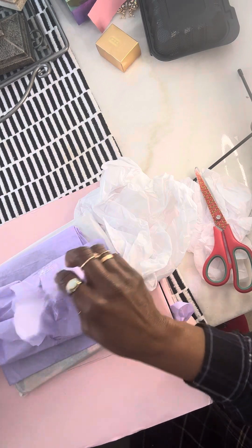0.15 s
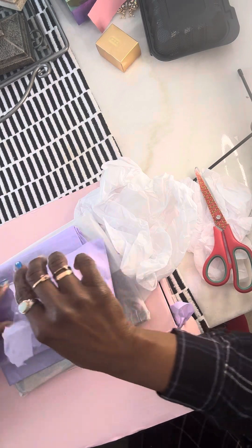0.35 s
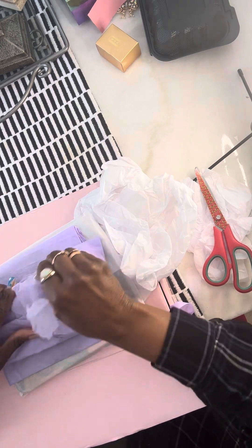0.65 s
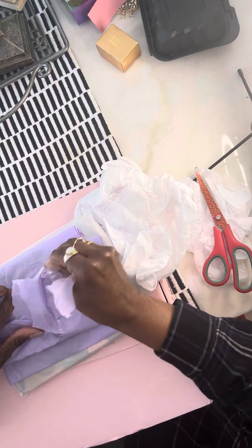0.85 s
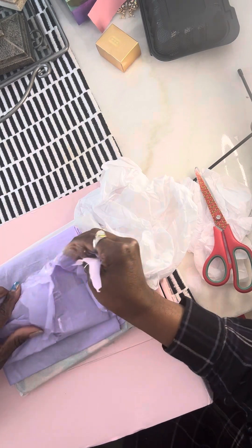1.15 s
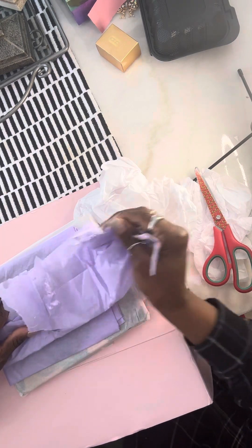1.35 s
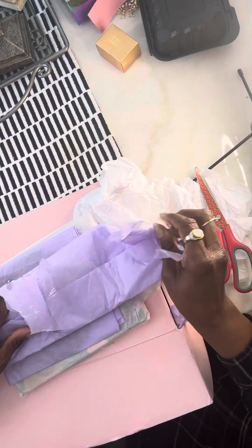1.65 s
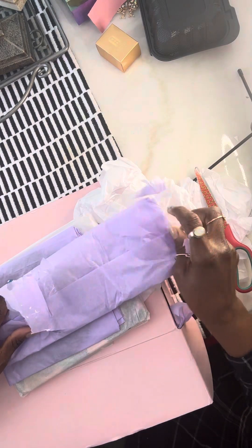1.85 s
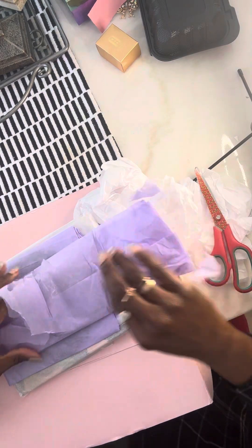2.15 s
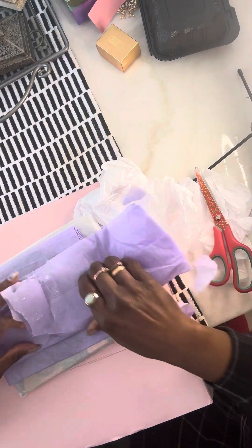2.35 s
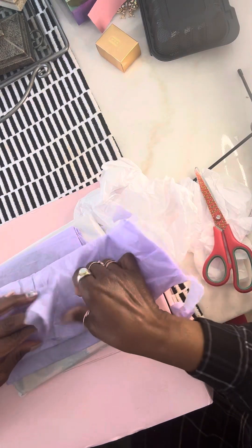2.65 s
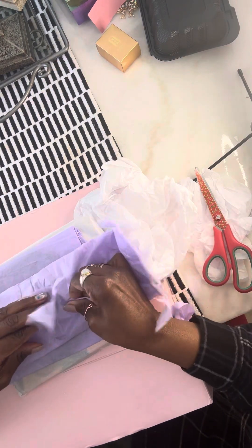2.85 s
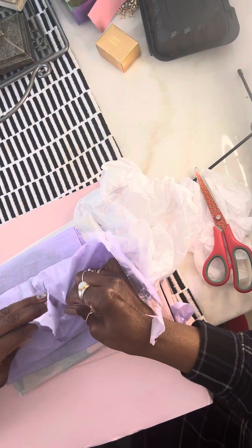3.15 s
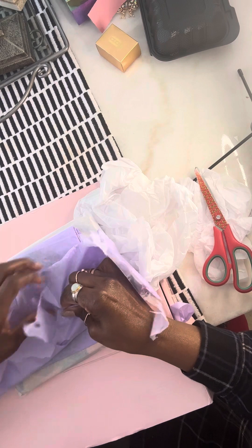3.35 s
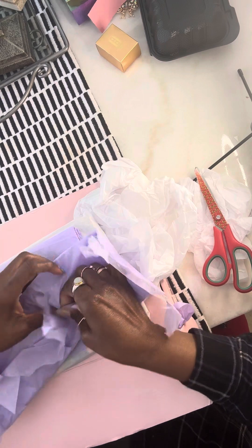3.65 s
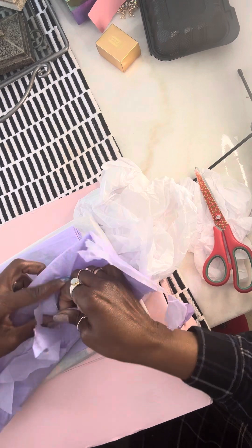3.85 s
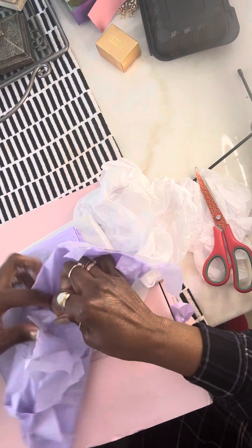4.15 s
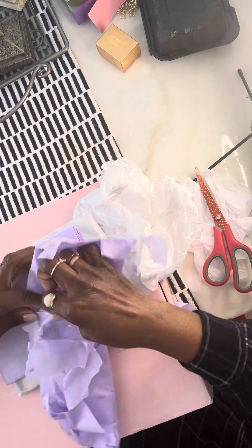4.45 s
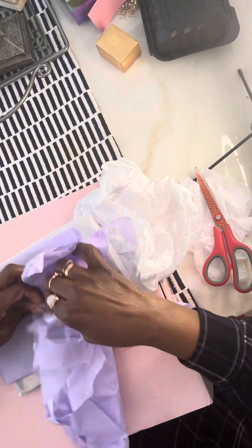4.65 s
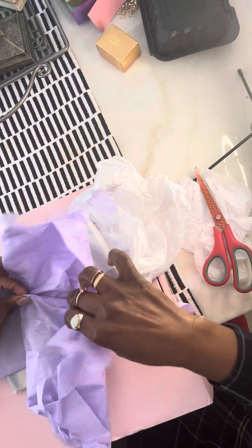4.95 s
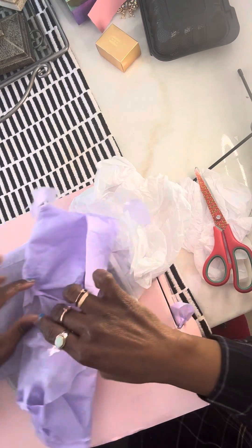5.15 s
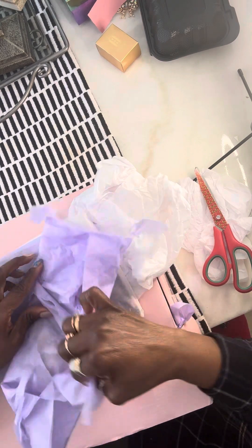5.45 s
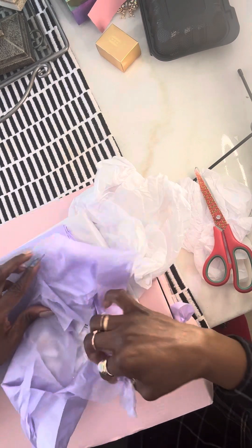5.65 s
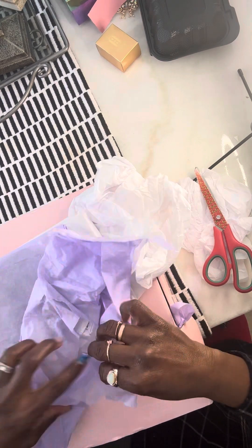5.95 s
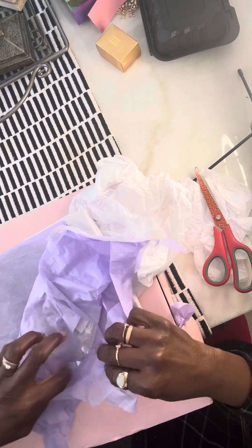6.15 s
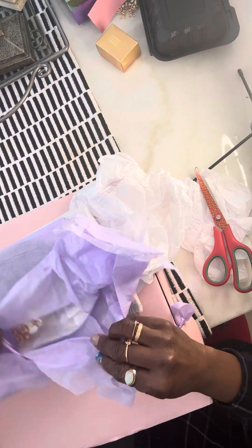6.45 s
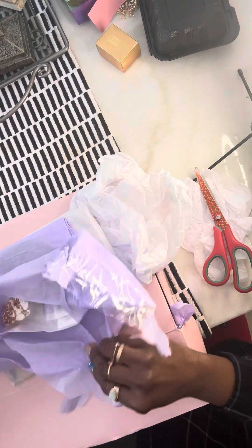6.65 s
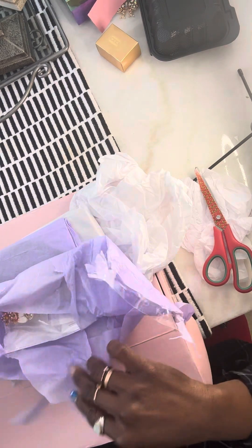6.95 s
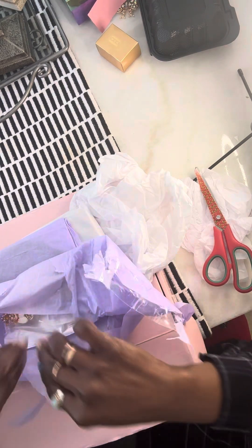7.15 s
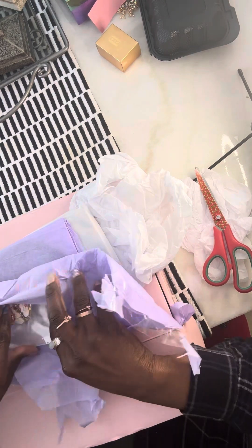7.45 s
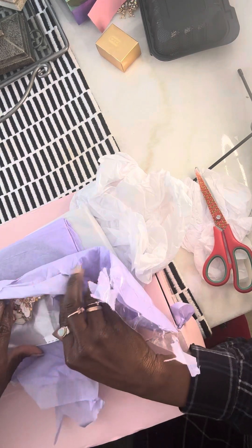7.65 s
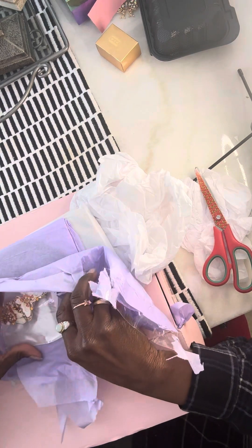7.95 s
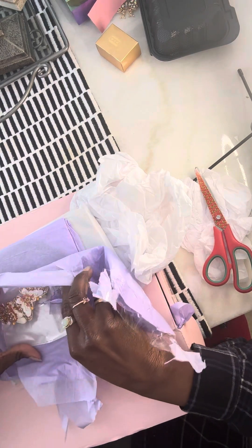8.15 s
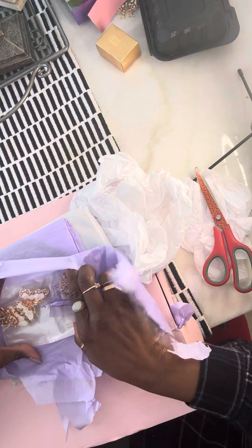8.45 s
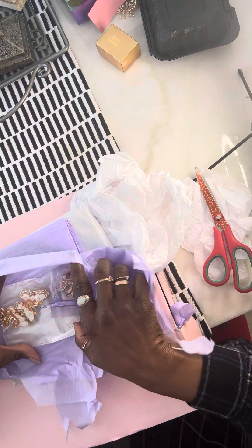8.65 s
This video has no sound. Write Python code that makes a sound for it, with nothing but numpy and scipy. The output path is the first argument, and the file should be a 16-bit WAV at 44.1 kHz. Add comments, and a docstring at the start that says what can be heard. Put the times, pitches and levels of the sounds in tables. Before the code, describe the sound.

Hands pull tissue paper from a parcel on a table, heard very close in stereo. A faint rustle comes first, then a burst of hard, bright crackles around one second. Softer crinkling and scattered snaps follow, with stronger tugs later and a dull low bump near six seconds. Quiet room air and low appliance hum stay underneath, with a light room tail.

```python
"""First a faint dry rustle over a low hum and quiet air, then harder tugs with loud, bright crackling.
Hands pull tissue paper off a gift on a table, close by in a quiet room.
Creases buckle in clumps of tiny noise bursts, larger ones crack, and sliding sheets hiss unevenly.
Loose pockets ring as filtered noise, taut folds ring on single notes, and the parcel bumps the table.
Reflections and a room tail follow the paper; two close-set microphone ports give the stereo image."""
import sys
import numpy as np
from scipy import signal
from scipy.fft import rfft, irfft, next_fast_len
from scipy.io import wavfile
from scipy.ndimage import uniform_filter1d

SR = 44100
rng = np.random.default_rng(int(sys.argv[2]) if len(sys.argv) > 2 else 0)


def wav_out(sig):
    """Save sig, one row per channel (or a flat mono array), as 16-bit PCM at SR to the path in sys.argv[1]."""
    wavfile.write(sys.argv[1], SR, np.round(np.clip(np.atleast_2d(sig).T, -1, 1) * 32767).astype(np.int16))


N = 388565
TIME, FREQ = np.arange(N) / SR, np.fft.rfftfreq(N, 1 / SR)


def amp(db):
    """Decibels to gain."""
    return 10 ** (np.asarray(db) / 20)


def unit(x):
    """Scales to rms 1."""
    return x / np.sqrt(np.mean(x ** 2) + 1e-20)


def read(table, hz, axis=1):
    """One column of a table, joined by straight lines over log frequency."""
    columns = np.transpose(table)
    return np.interp(np.log(hz + 1), np.log(columns[0] + 1), columns[axis])


def shaped(x, gain):
    """Filters by a gain given at each frequency of FREQ."""
    size = next_fast_len(N + 4096)  # padded, so the end does not wrap onto the start
    hz = np.fft.rfftfreq(size, 1 / SR)
    return irfft(rfft(x, size) * np.interp(hz, FREQ, gain), size)[..., :N]


def wander(rate_hz):
    """Smooth chance of rms 1 that moves up to about the given rate."""
    points = rng.standard_normal(4096)
    return unit(np.interp(TIME * rate_hz * 2, np.arange(4096), points))


def resonate(x, hz, width_hz):
    """A two-pole resonance with gain 1 at its centre."""
    centre, q = min(hz, SR / 2.5), hz / min(width_hz, SR / 5)
    return signal.lfilter(*signal.iirpeak(centre, q, fs=SR), x)


def add(mix, s, sound):
    """Mixes a sound in at a time in seconds."""
    part = mix[:, max(round(s * SR), 0):][:, :sound.shape[1]]
    part += sound[:, :part.shape[1]]


# partials of an appliance's hum: (f/Hz, rms level/dB)
HUM_PARTIALS = [(59.5, -58.5), (119, -59.5), (166.5, -54), (239, -68), (312, -67.5), (356, -59), (473, -75),
                (560, -66)]


def hum(waver):
    """Steady partials of an appliance, each with a phase that wanders by waver radians rms."""
    out = np.zeros(N)
    for hz, db in HUM_PARTIALS:
        phase = 2 * np.pi * hz * TIME + waver * wander(3.6)
        out += amp(db) * np.sqrt(2) * np.cos(phase)
    return out


# spectrum of the room's air noise: (f/Hz, relative spectral level/dB)
AIR_SPECTRUM = [(20, -38), (36, -22), (52, -2), (66, -1.5), (82, -12), (105, 1), (165, -2.5), (230, -6),
                (380, -10), (550, -18), (2000, -16.5), (15000, -31.5)]
AIR_DB = -48.5  # rms level of the air noise


def air():
    """Steady air noise: white noise filtered to the spectrum of the quiet room."""
    noise = rng.standard_normal((2, N))
    return amp(AIR_DB) * unit(shaped(noise, amp(read(AIR_SPECTRUM, FREQ))))


# ring of the room: (f/Hz, t60/s)
ROOM_RING = [(200, 0.79), (1500, 0.87), (5000, 0.72), (15000, 0.027)]


def echoes(early_db, early_decay, tail_db, size=16000):
    """The table and nearby things reflect at once; then the room rings, treble dying first."""
    t = np.arange(size) / SR
    sparse = rng.random((2, size)) < .1
    taps = rng.standard_normal((2, size)) * sparse * (t > .0015)
    early = unit(taps * np.exp(-t / early_decay))
    hz, when, z = signal.stft(taps, SR, nperseg=256)
    dying = amp(-60 * when / read(ROOM_RING, hz)[:, None])
    tail = signal.istft(z * dying, SR, nperseg=256)[1][:, :size]
    return (amp(tail_db) * unit(tail) + amp(early_db) * early) / np.sqrt(size)


def room(x, count=48):
    """The paper keeps moving, so each stretch of it meets other echoes."""
    out, step = x.copy(), N // count + 1
    for i in range(0, N, step):
        echo = echoes(early_db=-8.5, early_decay=0.0038, tail_db=-12.5)
        add(out, i / SR, signal.fftconvolve(x[:, i:i + step], echo, axes=1))
    return out


# the two microphone ports: (f/Hz, left-right likeness 0-1, phase lead of the left/rad)
PORT_PAIR = [(100, 1.0, 0.01), (500, 0.94, -0.04), (1200, 0.72, 0.21), (2100, 0.92, -0.04),
             (2750, 0.51, -0.44), (3850, 0.97, -0.03), (5000, 0.59, -0.8), (7300, 0.97, -3.06),
             (8400, 0.96, -3.22), (9700, 0.69, -4.76), (11000, 0.98, -6.25), (12500, 0.96, -6.35),
             (13400, 0.57, -7.61), (14800, 0.95, -9.38)]


def ports(x):
    """Two sound patterns reach close-set ports, in step and opposed, in shares that change with pitch."""
    same = np.clip(read(PORT_PAIR, FREQ), 0, 1)
    lead = read(PORT_PAIR, FREQ, axis=2)
    common = shaped(x[0], np.sqrt((1 + same) / 2))
    opposed = shaped(x[1], np.sqrt((1 - same) / 2))
    left = shaped(common + opposed, np.exp(.5j * lead))
    right = shaped(common - opposed, np.exp(-.5j * lead))
    return np.array([left, right])


# the parcel bumps the table: (t/s, rise/s, f/Hz of the lowest mode, level/dB of its swell)
TABLE_BUMPS = [(5.705, .05, 59.7, -36.5), (6.15, 0.023, 69.5, -41), (6.204, 0.025, 60.5, -31.5)]
TABLE_UPPER, TABLE_UPPER_DB = 1.3, -17  # the table's second mode: pitch and level re its lowest


def bumps():
    """A soft push into the table's two lowest modes, swelling and dying away."""
    out, t = np.zeros((2, N)), np.arange(SR // 2) / SR
    for s, rise, hz, db in TABLE_BUMPS:
        lowest = np.sin(2 * np.pi * hz * t)
        upper = np.sin(2 * np.pi * hz * TABLE_UPPER * t)
        push = t / rise * np.exp(1 - t / rise)
        add(out, s, (amp(db) * push * (lowest + amp(TABLE_UPPER_DB) * upper))[None])
    return out


# taut folds that slip and ring on one note: (t/s, f/Hz, t60/s, starting level/dB before the rise)
FOLD_NOTES = [(2.68, 1316, .04, -25), (5.6712, 2580, 0.025, -14), (5.6955, 2720, 0.15, -28),
              (7.054, 1900, 0.043, -39), (7.176, 1920, .05, -39)]


def folds(rise):
    """Each slip leaves a short, dying note in the fold."""
    out, t = np.zeros((2, N)), np.arange(SR // 3) / SR
    for s, hz, t60, db in FOLD_NOTES:
        envelope = amp(db - 60 * t / t60) * np.minimum(t / rise, 1)
        add(out, s, (envelope * np.sin(2 * np.pi * hz * t))[None])
    return out


def sliding(grip_db, grip_hz):
    """Sheet rubs on sheet: a hiss that catches and lets go."""
    return unit(rng.standard_normal((2, N)) * amp(grip_db * wander(grip_hz)))


# loose pockets that ring when dragged: (t/s, rise/s, length/s, f/Hz, width/Hz, level/dB before the swell)
PAPER_POCKETS = [(1.212, .02, 0.083, 4200, 1520, -26), (2.344, .004, 0.039, 510, 510, -38),
                 (2.631, 0.035, 0.11, 1400, 500, -35.5), (4.692, .012, 0.068, 5896, 1400, -25.5),
                 (4.728, 0.0072, 0.032, 1100, 400.5, -31), (5.654, .004, 0.17, 1765, 2300, -29),
                 (5.675, .006, 0.12, 2700, 417, -31.5), (5.652, 0.0052, 0.14, 598, 600, -30),
                 (5.656, .025, 0.17, 240, 70.4, -36), (6.109, 0.1, 0.18, 1741, 898.6, -35.5),
                 (6.314, 0.11, 0.3, 1850, 800, -39), (6.391, 0.01, 0.15, 418, 440, -28.5),
                 (6.47, .05, .11, 469.8, 360, -32.5)]


def pockets(rough_db):
    """Uneven rubbing drives the close resonances of each pocket, swelling and dying away."""
    out, rubbing = np.zeros((2, N)), sliding(grip_db=rough_db, grip_hz=128.0)
    for s, rise, length, hz, width, db in PAPER_POCKETS:
        t = np.arange(round(length * SR)) / SR
        edges = [max(hz - width / 2, hz / 10), hz + width / 2]
        band = signal.butter(4, edges, "band", fs=SR, output="sos")
        ring = signal.sosfilt(band, rubbing[:, round(s * SR):][:, :len(t)])
        swell = np.interp(t, [0, rise, length], [0, 1, 0])
        add(out, s, amp(db) * unit(ring) * swell)
    return out


# colour of the paper: (f/Hz, relative spectral level/dB)
SHEET_SPECTRUM = [(120, -9.5), (350, 1), (500, 0), (700, -0.5), (1000, -1.33), (1800, -1), (2300, -2.5),
                  (2700, -3.5), (4000, -3), (5000, -4.5), (6200, -1), (9500, -2.5), (13000, -3.5),
                  (15500, -11.5)]


def sheet_colour():
    """Gain of the sheet at each frequency, as it radiates some pitches better than others."""
    return amp(read(SHEET_SPECTRUM, FREQ))


FACET_Q = 3.36  # how sharply a facet rings: its pitch over its width
SNAP_RISE_S = 0.00022  # a crease takes a moment to give way


def snap(hz, decay, ring, size=900):
    """One crease flips: a sharp burst, coloured by its facet, radiating in two unlike patterns."""
    t = np.arange(size) / SR
    envelope = np.minimum(t / SNAP_RISE_S, 1) * np.exp(-t / max(decay, 1e-4))
    burst = rng.standard_normal((2, size)) * envelope
    return unit(burst + ring * resonate(burst, hz, hz / FACET_Q))


SPREAD_S = .0011  # a bending wave at 1 kHz takes this long to cross the sheet; higher ones are faster


def crack(hz, ring, size=900):
    """A facet jumps to its new shape: one sharp kick, whose treble runs ahead through the sheet."""
    f = np.fft.rfftfreq(size, 1 / SR)
    turns = 2 * SPREAD_S * np.sqrt(1000 * f) + rng.random((2, 1))  # phase lag in cycles
    kick = irfft(np.exp(-2j * np.pi * turns) * f / np.hypot(f, 400), size)
    return unit(kick + ring * resonate(kick, hz, hz / 2))


# large creases that snap over, before the trims in snaps():
# (t/s, level/dB, f/Hz at the centre of their colour, shiver of the sheet around them re level/dB)
LARGE_CREASES = [(0.2843, -38, 1490, -7), (0.389, -46, 5000, -8), (0.6223, -34, 1201, -8),
                 (0.6612, -34.5, 1700, -8), (0.677, -27, 3700, -8), (0.8481, -16.5, 3800, -7),
                 (0.8566, -19, 4500, -6), (0.8919, -25, 1700, -6), (0.9868, -16, 2580, -1),
                 (1.004, -13, 3800, -6), (1.013, -15, 2780, -7), (1.0185, -14.5, 2800, 0),
                 (1.047, -14, 4130, 9), (1.1674, -21, 3913, 6), (1.179, -20, 9340, -5),
                 (1.208, -13, 4420, -2), (1.2373, -18, 3830, -10), (1.2538, -11, 4130, -8),
                 (1.2652, -15, 4290, -4), (1.556, -31, 2400, -8), (1.7507, -24, 9030, -8),
                 (1.7525, -13.5, 1610, -2), (1.761, -25, 5450, -4), (1.9326, -30.5, 2998, -8),
                 (1.9722, -26, 1500, 4), (2.004, -32, 3000, -9), (2.0444, -31, 1400, -12),
                 (2.1366, -29.5, 3940, 11.5), (2.1932, -34, 1500, -3), (2.2413, -34, 3700, -8),
                 (2.4074, -28, 1700, -10), (2.4782, -23, 3497, -10), (2.5562, -31, 9500, -8),
                 (2.603, -32, 8140, -5), (2.681, -24, 1320, -4), (2.851, -31, 7020, -11),
                 (2.88, -24, 6950, -3), (2.9048, -30, 5490, -9), (3.051, -31, 1998, -10),
                 (3.0789, -31, 8620, -8), (3.1754, -34, 1695, -10), (3.219, -29, 1503, -8),
                 (3.2293, -25.5, 2000, -3), (3.2854, -19.5, 1600, -7), (3.339, -25.5, 6020, -10),
                 (3.3641, -26.5, 1998, -8), (3.3975, -27, 4097, -8), (3.4202, -31, 6204, -8),
                 (3.4553, -39, 8200, -8), (3.5265, -27, 7020, -7), (3.6715, -26, 3097, -8),
                 (3.696, -30, 4095, -8), (3.7176, -30, 2400, -8), (3.7327, -27, 3700, -6),
                 (3.815, -25.5, 4800, -8), (3.856, -27.5, 1996, -8), (3.9499, -31, 4403, -8),
                 (4.042, -24, 1503, -3), (4.0769, -19.5, 3023, -6), (4.2002, -29, 1300, -8),
                 (4.3259, -30, 3400, -6), (4.677, -16.5, 1499, -8), (5.0768, -28, 1794, -5),
                 (5.2167, -32, 1903, -4), (5.261, -24, 1988, -6), (5.277, -22, 9650, -11),
                 (5.382, -16, 5340, 0), (5.3893, -25, 5000, -5), (5.47, -20, 6210, -8),
                 (5.518, -22, 6182, -8), (5.6412, -24, 1800, -5), (5.659, -20, 1300, -1),
                 (5.8, -36, 11530, -1), (5.8705, -31.5, 10460, -15), (5.9926, -35, 7516, -8),
                 (6.0332, -32, 8635, -8), (6.1187, -23, 3700, -8), (6.131, -18.5, 1830, -4),
                 (6.162, -16.5, 3600, -6), (6.197, -15.5, 4560, -7), (6.295, -25, 7040, -7),
                 (6.443, -15, 1760, -5), (6.4965, -19, 6840, -9), (6.5421, -18, 7860, -9),
                 (6.792, -30, 7880, -12), (6.8997, -28.5, 4016, 9), (7.0546, -46, 1936, -13),
                 (7.112, -40, 9970, -20), (7.1255, -26.5, 3290, -4), (7.1755, -27, 1420, -3),
                 (7.2302, -31, 8530, -4), (7.2522, -21.5, 7255, -3), (7.3009, -24, 7020, -5),
                 (7.3711, -19, 2000, -12), (7.3975, -20, 2206, -6), (7.4258, -21, 5500, 1),
                 (7.486, -27, 2700, -4), (7.5571, -26.5, 9310, -9), (7.591, -25.5, 3700, -3),
                 (7.6015, -28, 8590, -8), (7.7094, -24, 2000, -5), (7.728, -32, 6484, -6),
                 (7.7812, -26, 8620, -9), (7.7936, -30, 9620, -9), (7.8117, -30, 6500, -9),
                 (7.8336, -28, 2403, -8), (7.9817, -26, 6816, -7), (8.0706, -25, 9710, -11),
                 (8.2106, -20, 9900, -11), (8.2553, -13, 4487, -1), (8.263, -16.5, 4000, 2),
                 (8.378, -21.5, 1347, 2), (8.3986, -22, 7200, -8), (8.5105, -27, 1700, -8),
                 (8.5335, -21, 7000, -9), (8.5697, -20.5, 1301, -8), (8.5934, -19, 7020, -10),
                 (8.6106, -21, 6517, -8)]
SNAP_DECAY_S, SNAP_HZ = 0.0015, 3000  # a crease of middling size: its decay time and colour
SMALL_DIES_FASTER, SMALL_SHIVERS_LESS = 0.17, 0.28  # powers of the facet's size


def snaps(level_db, ring, crack_ring, crack_db, burst_db, shiver_decay, shiver_hz, size=2600):
    """Large creases crack and burst, and the sheet shivers dully; wide facets sound lower and longer."""
    cracks, shiver, t = np.zeros((2, N)), np.zeros((2, N)), np.arange(size) / SR
    for s, db, hz, shiver_db in LARGE_CREASES:
        facet = SNAP_HZ / hz  # size re a middling one
        burst = snap(hz, SNAP_DECAY_S * facet ** SMALL_DIES_FASTER, ring)
        add(cracks, s, amp(db + burst_db) * burst + amp(db + crack_db) * crack(hz, crack_ring))
        tremble = rng.standard_normal((2, size)) * np.exp(-t / shiver_decay)
        add(shiver, s, amp(db + shiver_db) * min(facet, 1) ** SMALL_SHIVERS_LESS * tremble)
    dull_shiver = shaped(shiver, 1 / np.hypot(1, FREQ / shiver_hz))
    colour = sheet_colour() / np.hypot(1, 150 / (FREQ + 1))  # thin below 150 Hz
    return amp(level_db) * shaped(cracks + dull_shiver, colour)


def crackle(busy, per_s, spread_db, clump_db, clump_hz, decay, ring, count=240):
    """Creases of many sizes buckle in little avalanches: sparse in a light pull, dense in a hard one."""
    clumps = unit(amp(clump_db * wander(clump_hz)))
    at = np.flatnonzero(rng.random(N) < per_s / SR * busy * clumps)
    sizes = amp(spread_db * np.minimum(rng.exponential(1, len(at)), 3))
    sizes = sizes * rng.choice([-1, 1], len(at)) / np.sqrt(busy[at])  # evens out the power
    pitches = np.geomspace(900, 13000, count)
    facets = [snap(hz, decay * rng.lognormal(0, 0.52), ring) for hz in pitches]
    out = np.zeros((2, N))
    for i, size, k in zip(at, sizes, rng.integers(0, count, len(at))):
        add(out, i / SR, size * facets[k])
    return unit(out)


def flexing(x, patchy_db, size=9):
    """The sheet changes shape, so its broad resonances come and go."""
    z = signal.stft(x, nperseg=512)[2]
    patches = rng.standard_normal(z.shape[1:])
    for axis in (0, 1):  # smooth over frequency, then time
        patches = uniform_filter1d(patches, size, axis=axis)
    return signal.istft(z * amp(patchy_db * unit(patches)), nperseg=512)[1][:, :N]


# strokes of the hands, from slow gathering to quick tugs, before the band trims in rustle():
# (t/s, rise/s, hold/s, settling/s, level/dB, low rustle of whole sheets re level/dB, crisp treble re level/dB)
HAND_STROKES = [(0.0, 0.0022, 0.109, 0.091, -42.5, -16, -4), (0.3, 0.045, 0.088, 0.054, -42, -11, -3.5),
                (0.425, 0.056, 0.44, .06, -37, -14.5, -7), (0.785, 0.045, 0.07, .045, -32.5, -22, -8),
                (0.983, 0.015, 0.058, .04, -25.5, -17, -7), (1.178, 0.03, 0.065, .026, -26, -13, 0),
                (1.34, 0.058, .48, .075, -42, -13, -2), (1.911, 0.039, 0.104, .075, -44, -9.5, -7),
                (2.14, 0.08, 0.02006, .06, -40.5, -15, -5), (2.265, .05, .04, 0.051, -43, -14, -1.5),
                (2.34, 0.06, 0.045, .06, -35.5, -12, -3), (2.517, 0.042, 0.11, 0.076, -42, -13, 1),
                (2.615, .05, 0.071, 0.083, -35.5, -17, -1), (2.788, 0.07, .1, 0.0704, -38.5, -20, -4),
                (3.012, 0.024, 0.15, .06, -41.5, -22, -5), (3.24, .045, 0.17, .07, -38.5, -21, -3),
                (3.49, 0.06, 0.06, 0.069, -33, -17.5, -4), (3.629, 0.05, 0.17, .11, -38, -19, -4.5),
                (3.915, 0.08, .11, 0.0518, -34.5, -15, -3.5), (4.14, 0.0404, 0.15, .06, -40.5, -29, -5.5),
                (4.378, 0.11, 0.26, .075, -36.5, -14, -2), (4.667, .012, 0.095, .05, -27, -17, -2.5),
                (4.88, 0.039, 0.091, .11, -38.5, -15.5, -3.5), (5.125, 0.13, .12, .075, -33.5, -13.5, -2.5),
                (5.377, 0.00858, 0.022, .07, -23.5, -15.5, -0.5), (5.429, 0.0248, 0.063, .07, -31, -8, 2),
                (5.554, 0.067, 0.096, .06, -37, -18, -1), (5.876, 0.15, 0.053, .075, -34, -12.5, -2),
                (6.104, 0.019, 0.14, .065, -31, -16, -2), (6.281, 0.063, 0.2027, .07, -30.5, -12.5, 1),
                (6.571, .02, 0.045, .07, -35, -20, -1), (6.716, 0.038, 0.185, 0.022, -41.5, -17, -1.5),
                (7.179, 0.0399, .01, .04, -51, -13, 2), (7.221, 0.045, 0.06, .04, -31, -12.5, -3.5),
                (7.355, .035, .05, 0.0437, -31, -10.5, 0), (7.44, .03, 0.0463, 0.065, -33, -15, -1.5),
                (7.526, 0.046, 0.15, .075, -34.5, -16.5, -1.5), (7.739, 0.049, 0.11, .075, -39, -11, -2.5),
                (7.885, 0.044, 0.13, .075, -36.5, -16.5, -0.5), (8.071, 0.1, 0.08, .06, -36, -13, 1),
                (8.274, 0.035, 0.09, .07, -32, -15.5, -1.5), (8.42, 0.03, 0.03, .04, -35.5, -13, 0.5),
                (8.5, 0.02, 0.17, .06, -33.5, -12.5, -.5), (8.71, 0.0322, 0.0498, .06, -35, -13.5, -1)]
EASE_DB = 1  # the pull slackens by this much over a stroke
UNEVEN_DB, UNEVEN_HZ = 0.65, 18  # the fingers never pull quite evenly


def effort():
    """Low, middle and crisp gains: each stroke swells, slackens and dies away; overlaps add in power."""
    power = np.zeros((3, N))
    for s, rise, hold, release, db, low_db, crisp_db in HAND_STROKES:
        t = np.arange(0, rise + hold + 10 * release, 1 / SR)
        slacken = amp(EASE_DB * (.5 - np.minimum(t / (rise + hold), 1)))
        pull = np.minimum(t / rise, 1) * slacken
        settle = np.exp(-np.maximum(t - rise - hold, 0) / release)
        levels = amp(db + np.array([[low_db], [0], [crisp_db]]))
        add(power, s, (levels * pull * settle) ** 2)
    return np.sqrt(power) * amp(UNEVEN_DB * wander(UNEVEN_HZ))


BUSIER = .6  # a harder pull buckles more creases: their rate goes with this power of the effort


def rustle(slide_db, pop_db, tick_db, low_db, mid_db, high_db):
    """Fine crackle, sparser pops, thin ticks and sliding hiss all follow the hands."""
    gains = effort()
    busy = np.maximum(unit(gains[1]), .1) ** BUSIER
    fine = crackle(busy, per_s=1200, spread_db=0.8, clump_db=4, clump_hz=110.03, decay=0.00059, ring=2.05)
    pops = crackle(busy, per_s=160, spread_db=2.0, clump_db=3, clump_hz=25.05, decay=0.00063, ring=2.6)
    ticks = crackle(busy, per_s=50, spread_db=1.0, clump_db=3, clump_hz=20, decay=0.00015, ring=1.9)
    ticks = shaped(ticks, FREQ / np.hypot(FREQ, 5000))  # the smallest facets radiate mostly treble
    hiss = sliding(grip_db=1.0, grip_hz=89.0)
    layers = fine + amp(pop_db) * pops + amp(tick_db) * ticks + amp(slide_db) * hiss
    paper = flexing(layers, patchy_db=1.68)
    colour = sheet_colour() / (1 + (130 / (FREQ + 1)) ** 4)  # little below 130 Hz
    under = 1 / (1 + (FREQ / 720) ** 6)
    over = 1 - 1 / (1 + (FREQ / 5600) ** 6)
    bands = [(under, low_db), (1 - under - over, mid_db), (over, high_db)]
    out = np.zeros((2, N))
    for (band, db), gain in zip(bands, gains):
        out += unit(shaped(paper, colour * band)) * amp(db) * gain
    return out


def scene():
    """Paper in the room, with table bumps, over the hum and air."""
    background = hum(waver=0.49) + air()
    paper = rustle(slide_db=-5.5, pop_db=-7.5, tick_db=-6.0, low_db=-1, mid_db=-1.3, high_db=-2.5)
    paper = paper + snaps(level_db=-9.0, ring=4.1, crack_ring=2.8, crack_db=-4.5, burst_db=-5.5,
                          shiver_decay=0.0086, shiver_hz=7000)
    paper = paper + pockets(rough_db=-1.0) + folds(rise=0.0011)
    return ports(room(paper) + bumps() + background)


EDGE_HZ = 15740  # upper band limit


def record(dry):
    """The recorder's band limit: a steep linear-phase low-pass."""
    low_pass = signal.firwin(511, EDGE_HZ, window=("kaiser", 9), fs=SR)
    return signal.oaconvolve(dry, low_pass[None], "same")


dry = scene()
out = record(dry)
wav_out(out)
```